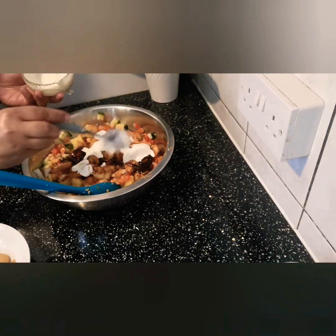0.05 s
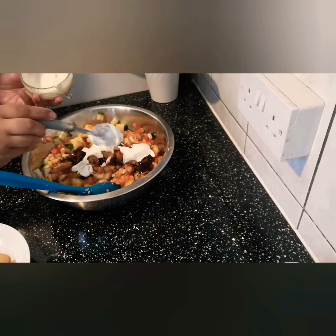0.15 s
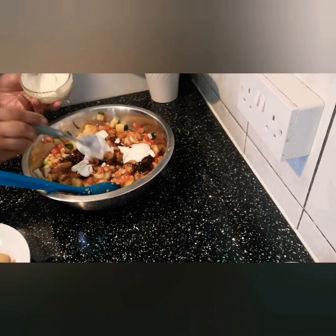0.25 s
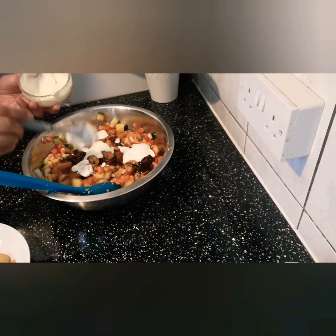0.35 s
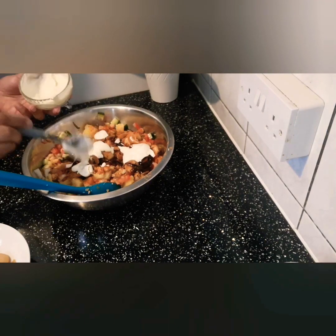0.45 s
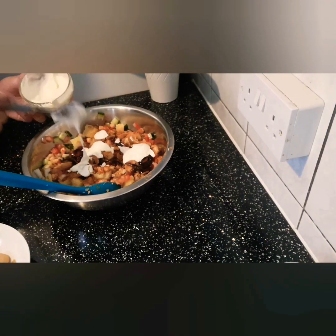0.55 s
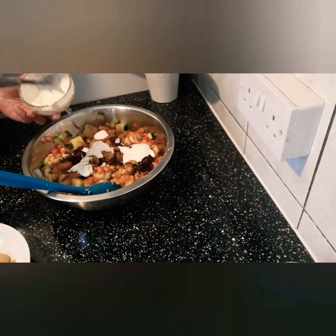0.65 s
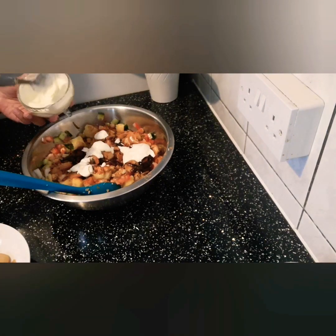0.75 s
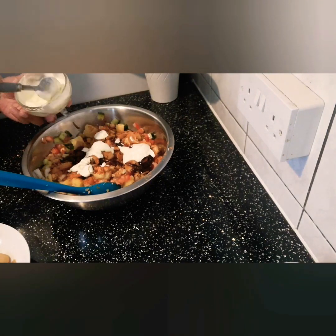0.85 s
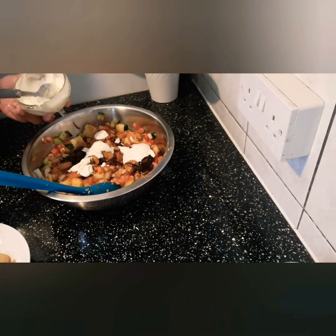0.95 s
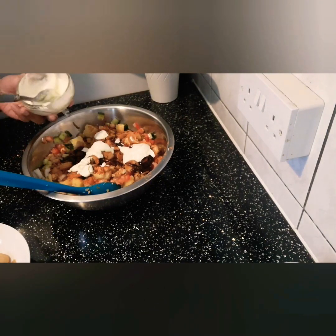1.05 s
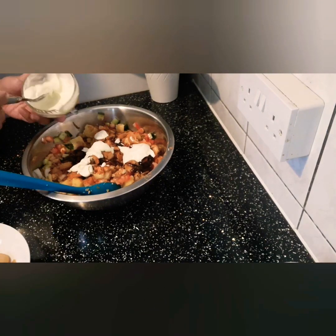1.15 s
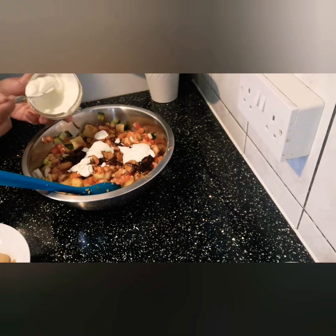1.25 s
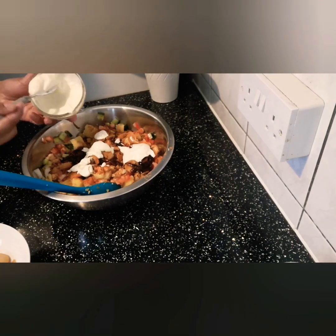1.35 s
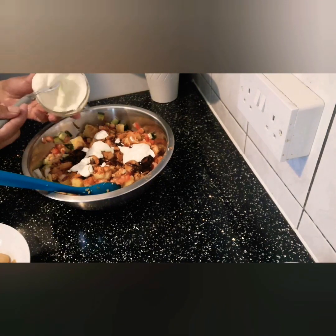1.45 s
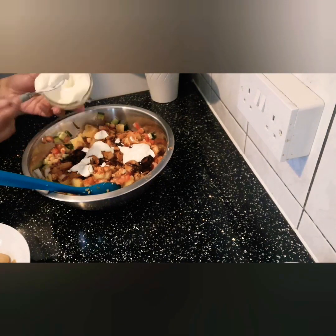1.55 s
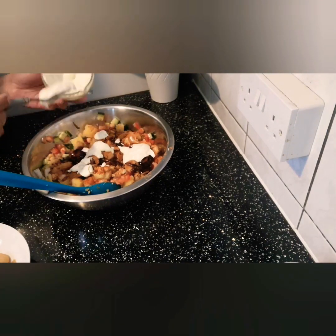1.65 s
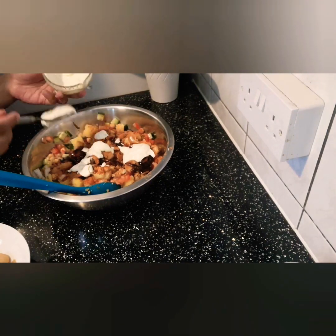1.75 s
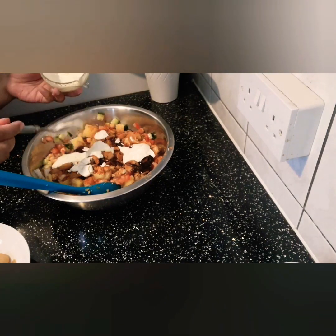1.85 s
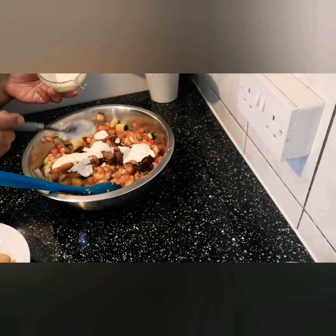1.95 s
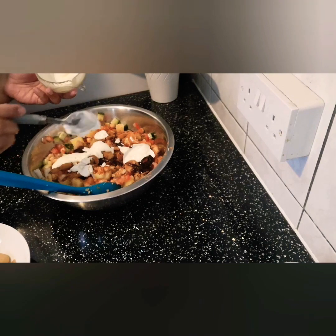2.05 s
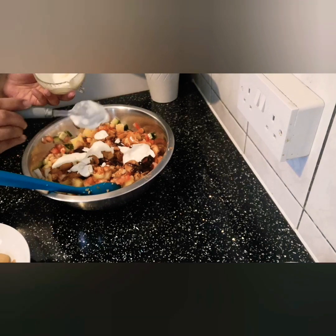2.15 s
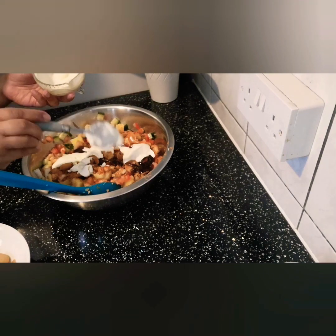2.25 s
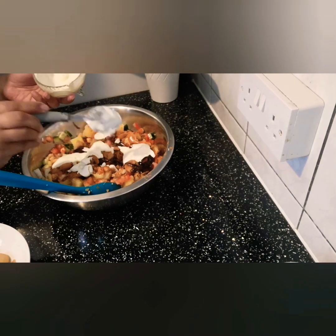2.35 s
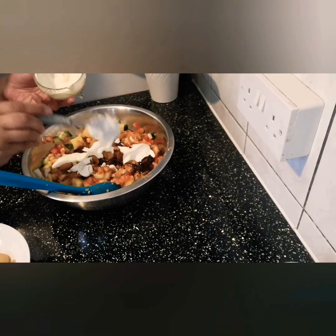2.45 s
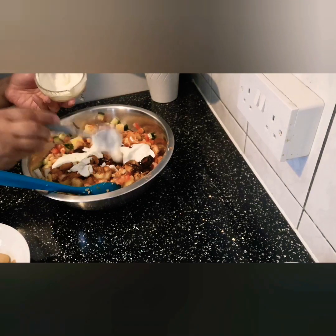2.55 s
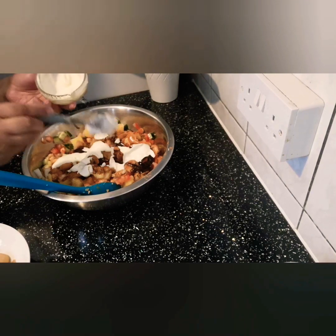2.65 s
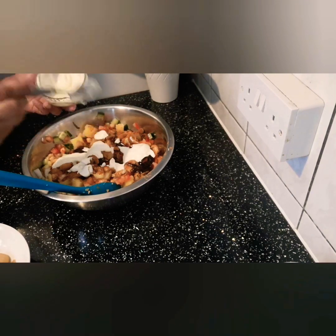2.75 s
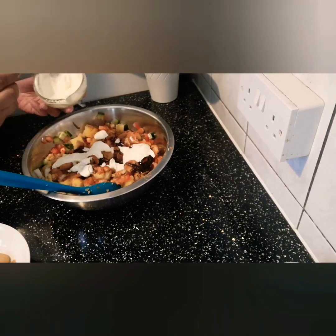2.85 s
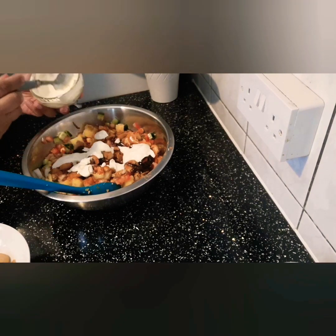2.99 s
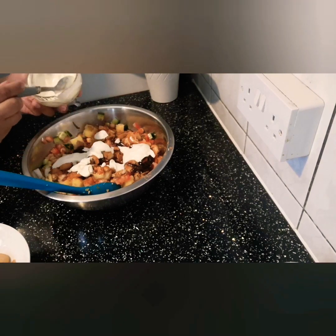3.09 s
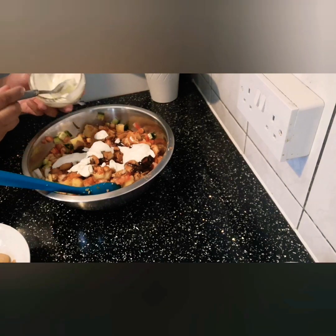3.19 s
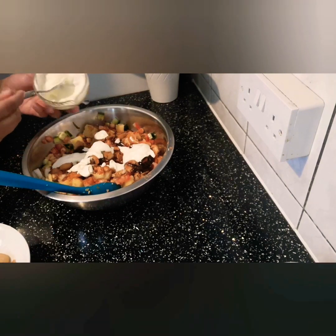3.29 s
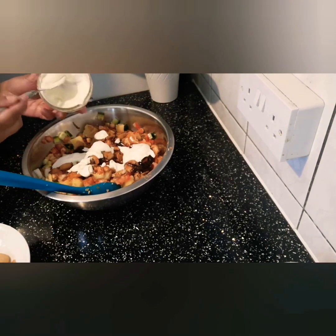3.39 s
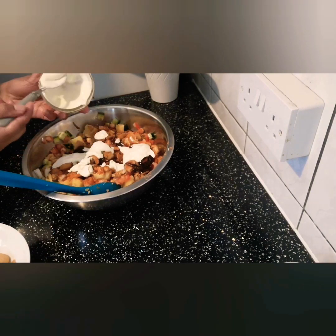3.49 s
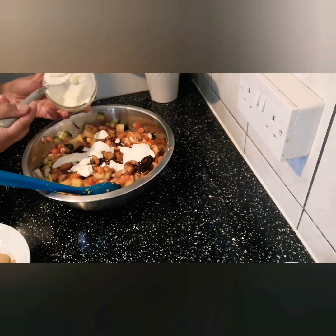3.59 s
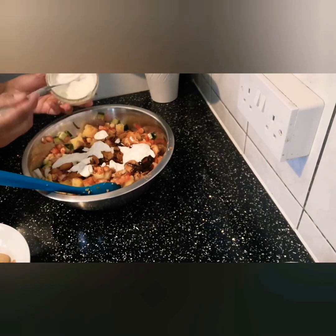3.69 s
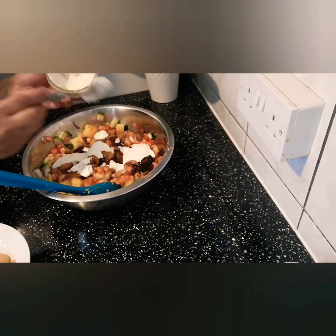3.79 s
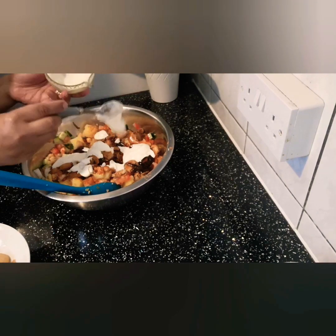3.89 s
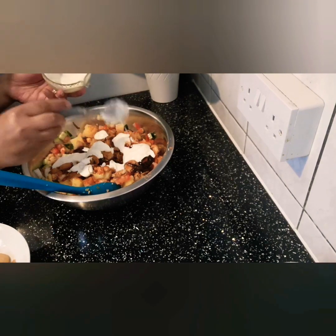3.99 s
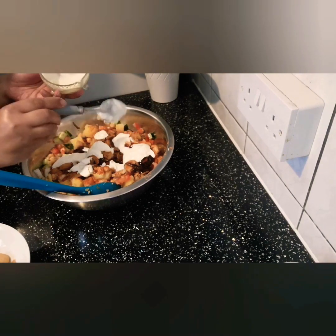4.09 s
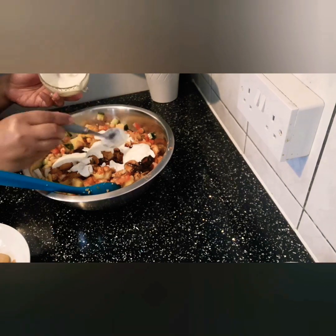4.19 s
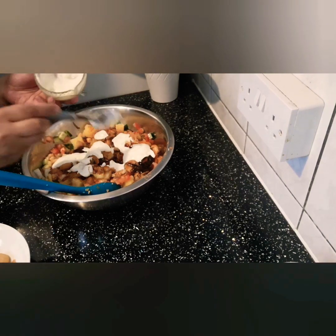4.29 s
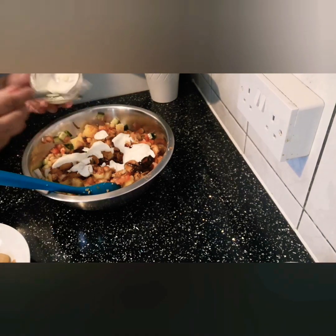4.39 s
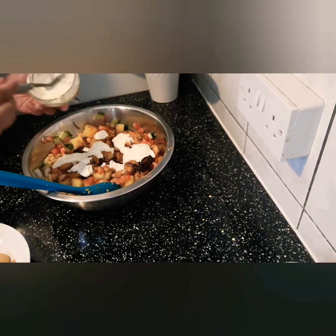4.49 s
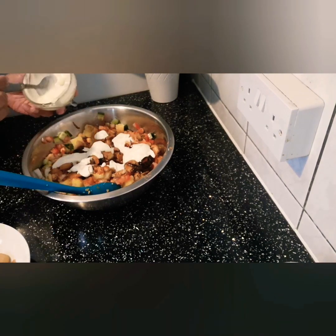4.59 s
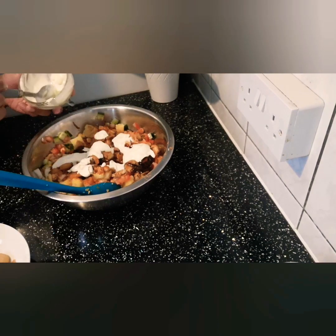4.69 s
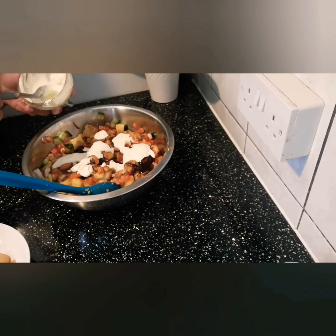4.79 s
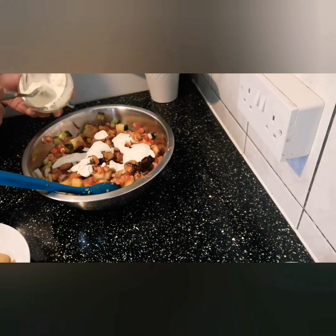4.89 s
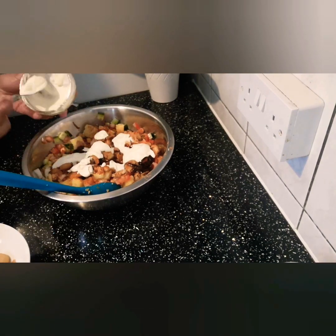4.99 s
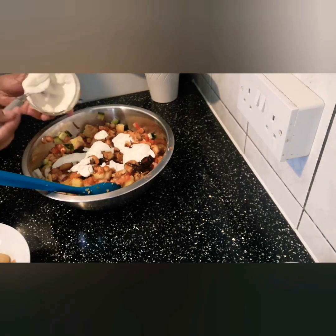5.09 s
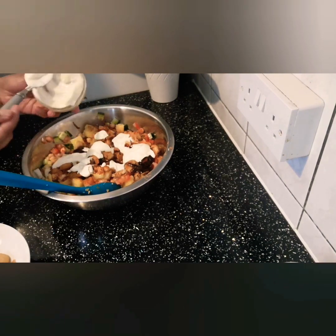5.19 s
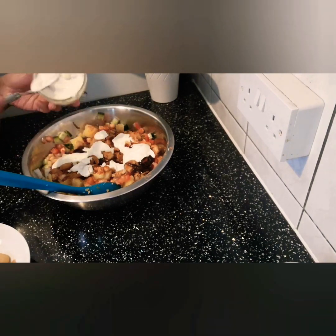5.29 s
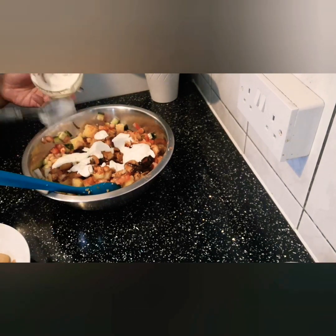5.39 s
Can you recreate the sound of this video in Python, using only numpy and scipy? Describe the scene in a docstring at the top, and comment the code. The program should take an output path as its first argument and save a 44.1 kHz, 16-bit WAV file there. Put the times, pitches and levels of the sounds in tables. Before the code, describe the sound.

Close to the microphones and a little left, a spoon knocks against a hand-held glass bowl in three separate groups of bright, quickly damped clinks. In the gaps, cream is smeared and shaken off with barely audible wet swishes. The last group finishes in a quick rattle and one more smear. A low appliance hum and faint hiss fill the small kitchen throughout.

```python
"""A tiled kitchen, a stereo pair of microphones near the counter, an appliance humming throughout.
A metal spoon scoops cream from a small hand-held glass bowl: a soft smear, then clinks at about 1 s,
the hardest with a dry snap. Each is a knock, a short ring of glass and the spoon's bending modes.
Cream swishes as it is smeared and shaken off over a steel bowl of vegetables; more clinks come just
after 3 s and from 4.7 s. At 5.1 s the spoon judders along the glass, and one last smear follows."""
import sys
import numpy as np
from scipy import signal
from scipy.fft import rfft, irfft
from scipy.io import wavfile

SR = 44100
rng = np.random.default_rng(int(sys.argv[2]) if len(sys.argv) > 2 else 0)


def store_pcm(level_fs):
    """Save levels as 16-bit WAV."""
    pcm = np.round(np.clip(level_fs, -1, 1) * 32767).astype(np.int16)
    wavfile.write(sys.argv[1], SR, np.atleast_2d(pcm).T)


N = 239769
TOUCH_TIME = np.arange(SR // 2) / SR  # seconds since a contact

# spoon on glass: start_s, knock_db, glass_db, spoon_db, hardness_db, pitch_ratio, low_hz, high_hz
BLOWS = [ (0.9563, -10.5, -14.5, -21.5, 2.5, 0.98, 940, 10000),
         (1.1442, -13.5, -27, -8, 2.5, 0.92, 1990, 8150), (1.145, -7, -14, -3, 4.6, 0.97, 1930, 7900),
         (1.415, -51, -55, -21, -14, 0.967, 1600, 7000), (3.147, -15, -22.5, -23, 6, 1.005, 1250, 8100),
         (3.202, -27, -46, -21.5, -19, 0.99, 1400, 9500),
         (3.371, -12, -17.5, -0.8, -8.7, 1.004, 1400, 6200), (4.7161, -8.5, -13, -33, 8, 1.0, 980, 11000),
         (4.7422, -11.5, -19.5, -1, -5.5, 1.015, 1400, 9100), (4.928, -48, -29, -57, -2, 1.0, 2510, 2840),
         (5.0134, -26, -28, -30.5, 3, 1.03, 1590, 6000), (5.0186, -23.5, -14, -19.5, 4, 1.05, 1630, 5800)]
# the spoon's bending modes, damped by fingers and cream: pitch_hz, t60_s
SPOON_MODES = [(1985, 0.032), (4765, 0.05), (8290, 0.014)]
# modes of the glass bowl: pitch_hz, level_db, t60_s
GLASS_MODES = [(1155, -4, .014), (1418, -6, 0.021), (1718, -5.5, .03), (2772, 4, 0.017), (2950, 0.5, 0.03),
               (3440, -25, .02), (4140, -23, .02), (5577, 1, 0.023), (5830, -4.5, 0.029), (6980, -4, 0.035),
               (9300, -6, .035), (10800, -15, .03)]
# the snap on bare glass: start_s, level_db, pan_db
BARE_GLASS_SNAP = (1.1434, -17, 11)
# the spoon juddering: start_s, length_s, knock_db, glass_db, spoon_db, hardness_db, low_hz, high_hz
JUDDER = (5.106, 0.1, -19.5, -20, -10, -5.5, 1777, 7200)
# cream smeared and shaken off: peak_s, length_s, swish_hz, swish_db, fizz_db
CREAM_SMEARS = [(0.647, 0.1, 3100, -64.5, -85), (1.817, 0.15, 4300, -74.5, -75.5),
                (1.993, 0.13, 2480, -59, -74), (2.37, 0.07, 3580, -71, -74), (2.822, 0.31, 2960, -72, -79),
                (4.0, 0.06, 4900, -68, -68), (4.06, 0.125, 2600, -69.5, -66),
                (5.42, 0.13, 2410, -62, -74.5)]
# spectrum of the glass jolting in the hand: frequency_hz, density_db
JOLT_SPECTRUM = [(40, -8), (130, 0), (300, -16.5), (560, -22), (800, -14), (1300, -24), (12000, -42)]
# decay of the tiled room: frequency_hz, t60_s
ROOM_DECAY = [(500, 0.34), (2000, .31), (4700, 0.31), (8000, 0.28), (14000, 0.23)]
# partials of the appliance: pitch_hz, relative_db
HUM_PARTIALS = [(100, -62.5), (166, -70), (200, -74.5), (300, -87.5), (437, -85)]
# low room tone: frequency_hz, density_db
RUMBLE_SPECTRUM = [(20, -12), (35, -11), (52, 1), (80, -8.5), (120, 4.5), (180, -7.5), (240, -5),
                   (300, -19.5), (450, -28), (900, -50)]
# the room's hiss: frequency_hz, density_db
HISS_SPECTRUM = [(180, -31), (300, -3.5), (378, -2.5), (439, -3), (571, -6), (620, -8.5), (953, -6.5),
                 (1180, -6.5), (1750, -2), (4350, -13.5), (7500, -13), (10100, -26.5), (15500, -28.5)]
# contour of the hiss, centred and scaled down in use: time_s, contour_db
HISS_DRIFT = [(0.0, -71), (0.41, -72.5), (1.0, -70), (1.15, -64.5), (1.42, -72), (1.72, -71), (1.89, -69.5),
              (2.35, -72.5), (3.41, -70), (3.59, -75), (4.77, -73), (4.92, -66), (5.44, -67.5)]
# likeness of diffuse noise at the two microphones: frequency_hz, correlation
MIC_COHERENCE = [(50, 0.95), (180, 0.99), (350, 0.23), (700, 0.14), (2000, 0.17), (12000, .3)]

GLASS_PAN_DB = 6  # the bowl is left of the microphones


def clinks(slide_s=0.0019):
    """The spoon knocks into the glass and clinks on its way out."""
    out = np.zeros((2, N))
    for start_s, *blow in BLOWS:
        add(out, start_s, touch(*blow, slide_s))
    return out


def touch(knock_db, glass_db, spoon_db, hardness_db, pitch_ratio, low_hz, high_hz, slide_s):
    """One contact: knock, glass and spoon. Hardness lifts the upper bends; pressure shifts their pitch."""
    paths, force = kitchen_paths(), contact_force(slide_s)
    glass = sum(amp(db) * unit_energy(ring(force, hz, t60)) for hz, db, t60 in GLASS_MODES)
    sound = amp(knock_db) * in_kitchen(gripped(knock(force), low_hz, high_hz), paths, wet_db=0)
    sound += amp(glass_db) * in_kitchen(gripped(glass, low_hz, high_hz), paths, wet_db=2)
    sound *= panned(GLASS_PAN_DB)
    middle_db = spoon_db + hardness_db
    bends_db = [spoon_db, middle_db, 1.2 * middle_db - 9.3]  # the top bend grows faster than the middle
    for k, ((hz, t60), db) in enumerate(zip(SPOON_MODES, bends_db)):
        # higher bends feel the pressure less and beam more to one side
        bend = ring(force, hz * pitch_ratio ** (1 / (k + 1)), t60)
        wet_db, beam = (-4.5, 0.91) if k else (-0.5, 0.055)
        sound += amp(db) * panned(beam * GLASS_PAN_DB) * in_kitchen(bend, paths, wet_db)
    return sound


def contact_force(slide_s, grit=0.15):
    """A click, then grinding while the spoon slides on."""
    force = grit * rng.standard_normal(len(TOUCH_TIME)) * np.exp(-TOUCH_TIME / slide_s)
    force[0] += 1
    return force


def knock(force, soft_hz=4000):
    """The contact itself, falling gently towards the treble."""
    return signal.sosfilt(signal.butter(1, soft_hz, fs=SR, output="sos"), force)


def ring(force, hz, t60):
    """One dying mode, driven by the contact force; it radiates only near its own pitch."""
    mode = np.cos(2 * np.pi * hz * TOUCH_TIME) * amp(-60 * TOUCH_TIME / t60)
    band = signal.butter(2, [hz - 300, hz + 300], "band", fs=SR, output="sos")
    return signal.sosfilt(band, signal.fftconvolve(force, mode)[:len(TOUCH_TIME)])


def gripped(sound, low_hz, high_hz):
    """The hand's grip damps the low end; cream on the contact dulls the top."""
    grip = signal.butter(6, low_hz, "high", fs=SR, output="sos")
    cream = signal.butter(6, high_hz, fs=SR, output="sos")
    return signal.sosfilt(np.vstack([grip, cream]), sound)


def snap(band_hz=(4000, 14000)):
    """The hardest blow meets bare glass: a bright click, straight to the microphones."""
    start_s, level_db, pan_db = BARE_GLASS_SNAP
    band = signal.butter(2, band_hz, "band", fs=SR, output="sos")
    click = unit_energy(signal.sosfilt(band, signal.unit_impulse(len(TOUCH_TIME))))
    out = np.zeros((2, N))
    add(out, start_s, amp(level_db) * panned(pan_db) * click)
    return out


def judder(slips=7, jitter_s=0.0005, rise_s=0.014, fade_from_s=0.041, fade_db_per_s=318, dull_db_per_s=130):
    """The spoon slips along the glass in a quick run that swells, holds and fades as its pitch sinks."""
    start_s, length_s, knock_db, glass_db, spoon_db, hardness_db, low_hz, high_hz = JUDDER
    out = np.zeros((2, N))
    for t, pitch_ratio in zip(np.linspace(0, length_s, slips), np.linspace(1.075, 0.98, slips)):
        rise_db = -7.5 * max(1 - t / rise_s, 0)
        fade_db = fade_db_per_s * max(t - fade_from_s, 0)
        dull_db = dull_db_per_s * t  # the contact softens as the spoon slides into the cream
        slip = touch(knock_db - dull_db, glass_db - dull_db, spoon_db, hardness_db - dull_db,
                     pitch_ratio, low_hz, high_hz, slide_s=0.008)
        add(out, start_s + t + jitter_s * rng.standard_normal(), amp(rise_db - fade_db) * slip)
    return out


def smears(grain_db=3, fizz_hz=7120, pan_db=2):
    """Cream swishes softly: fine grains in a broad resonance and a high wet fizz, swelling together."""
    t, hz = np.arange(N) / SR, np.fft.rfftfreq(N, 1 / SR)
    grains = rfft(rng.standard_normal((2, N)) * amp(grain_db * np.minimum(rng.exponential(1, N), 4)))
    out = np.zeros((2, N))
    for peak_s, length_s, swish_hz, swish_db, fizz_db in CREAM_SMEARS:
        swish = (swish_hz, 0.36, swish_db, length_s)
        fizz = (fizz_hz, 0.18, fizz_db, 1.08 * length_s)
        for centre_hz, octaves, db, span_s in (swish, fizz):
            colour = np.exp(-.5 * (np.log2((hz + 1) / centre_hz) / octaves) ** 2)
            swell = np.exp(-2 * ((t - peak_s) / span_s) ** 2)
            out += amp(db) * unit_rms(irfft(grains * colour, N)) * swell
    return out * panned(pan_db)


def jolts(base_db=-60, rise_s=0.069, follow=0.35):
    """The glass jolts in the hand after each blow: a dull swell, stronger when the spoon rings loudly."""
    t, power = np.arange(N) / SR, np.zeros(N)
    for start_s, spoon_db in [(row[0], row[3]) for row in BLOWS] + [(JUDDER[0], JUDDER[4])]:
        age = np.maximum(t - start_s, 0) / rise_s
        power += (amp(follow * spoon_db) * age * np.exp(1 - age)) ** 2
    return amp(base_db) * diffuse_noise(JOLT_SPECTRUM) * np.sqrt(power)


def kitchen_paths(near_s=0.0039, near_db=5, build_s=0.0052, wall_s=0.045, wall_spread_s=0.0071):
    """Spoon to microphones: direct sound with quick echoes off bowl and counter, then the room's tail."""
    t = TOUCH_TIME
    shape = (2, 2, len(t))
    near, tail = rng.standard_normal(shape) * (rng.random(shape) < .2)  # sparse reflections
    near = amp(near_db) * unit_energy(near * np.sqrt(t) * np.exp(-2 * t / near_s))
    near[:, 0] += 1  # direct sound
    near[1] = np.roll(near[1], 26)  # it reaches the right microphone later
    hz, frame_s, frames = signal.stft(tail, SR, nperseg=256)
    decay = amp(-60 * frame_s / at_frequency(ROOM_DECAY, hz)[:, None])
    tail = signal.istft(frames * decay, SR, nperseg=256)[1][:, :len(t)]
    build_up = 1 - np.exp(-(t / build_s) ** 2)
    walls = 1 + 0.34 * np.exp(-((t - wall_s) / wall_spread_s) ** 2)  # far-wall echoes bunch together
    return near, tail * build_up * walls


def in_kitchen(sound, paths, wet_db):
    """A short sound at the microphones, by way of the near paths and the tail."""
    near, tail = (signal.fftconvolve(sound[None], path, axes=1)[:, :len(TOUCH_TIME)] for path in paths)
    return unit_energy(near) + amp(wet_db) * unit_energy(tail)


def appliance_hum(waver_rad_per_hz=0.0012):
    """An appliance hums under the scene, each partial wavering slowly in phase."""
    t, knots_s = np.arange(N) / SR, np.linspace(0, N / SR, 20)
    hum = np.zeros(N)
    for hz, db in HUM_PARTIALS:
        waver = waver_rad_per_hz * hz * np.interp(t, knots_s, rng.standard_normal(len(knots_s)))
        hum += amp(db) * np.sqrt(2) * np.sin(2 * np.pi * (hz * t + rng.random()) + waver)
    return hum


def room_tone(low_gain_db=0.64, hiss_db=-65.5, hiss_pan_db=3.5, drift_share=0.53):
    """The kitchen's bed: low rumble, the hum and a faint hiss whose level drifts."""
    low = amp(-64.5) * diffuse_noise(RUMBLE_SPECTRUM) + appliance_hum()
    hiss = amp(hiss_db) * diffuse_noise(HISS_SPECTRUM) * panned(hiss_pan_db)
    time_s, contour_db = np.transpose(HISS_DRIFT)
    drift_db = drift_share * np.interp(np.arange(N) / SR, time_s, contour_db - contour_db.mean())
    return amp(low_gain_db) * low + hiss * amp(drift_db)


def diffuse_noise(spectrum):
    """Coloured noise at the two microphones, nearly mono in the bass."""
    hz = np.fft.rfftfreq(N, 1 / SR)
    left, independent = rfft(rng.standard_normal((2, N)))
    likeness = at_frequency(MIC_COHERENCE, hz)
    right = likeness * left + np.sqrt(1 - likeness ** 2) * independent
    return unit_rms(irfft(np.array([left, right]) * amp(at_frequency(spectrum, hz)), N))


def amp(db):
    """Decibels to gain."""
    return 10 ** (np.asarray(db) / 20)


def panned(db):
    """Channel gains with the left louder by db."""
    return amp([[db / 2], [-db / 2]])


def unit_rms(x):
    """Scales to an rms of one."""
    return x / np.sqrt(np.mean(x ** 2) + 1e-20)


def unit_energy(x):
    """Scales each channel to an energy of one."""
    return x / np.sqrt(np.sum(x ** 2, axis=-1, keepdims=True) + 1e-20)


def at_frequency(table, hz):
    """Reads a table along a log-frequency axis."""
    table_hz, values = np.transpose(table)
    return np.interp(np.log(hz + 1), np.log(table_hz), values)


def add(mix, start_s, sound):
    """Adds a stereo sound to the mix at start_s."""
    part = mix[:, round(start_s * SR):][:, :sound.shape[1]]
    part += sound[:, :part.shape[1]]


def scene():
    """Spoon, glass, cream and kitchen as they reach the microphones."""
    return clinks() + snap() + judder() + jolts() + smears() + room_tone()


def record(dry):
    """The recorder's band ends at 15.9 kHz."""
    lowpass = signal.firwin(255, 15900, window=("kaiser", 8), fs=SR)
    return signal.oaconvolve(dry, lowpass[None], "same")


dry = scene()
out = record(dry)
store_pcm(out)
```